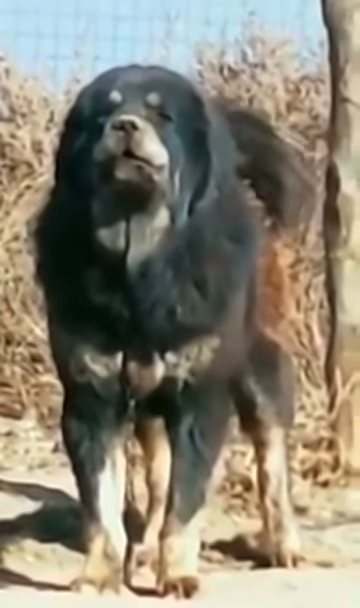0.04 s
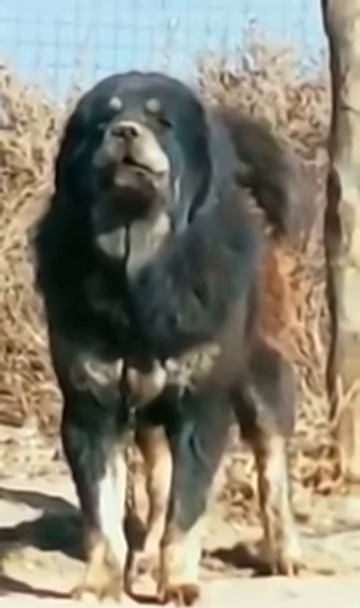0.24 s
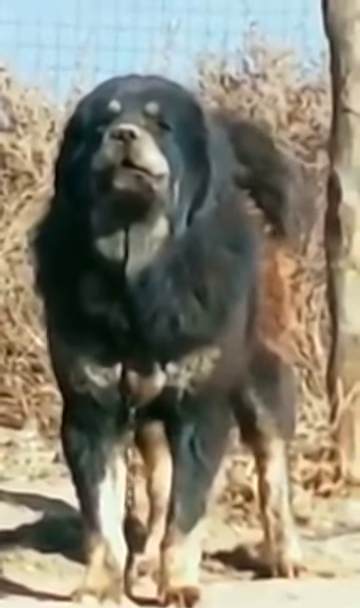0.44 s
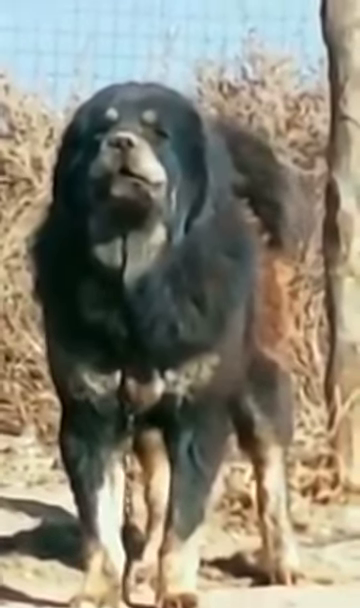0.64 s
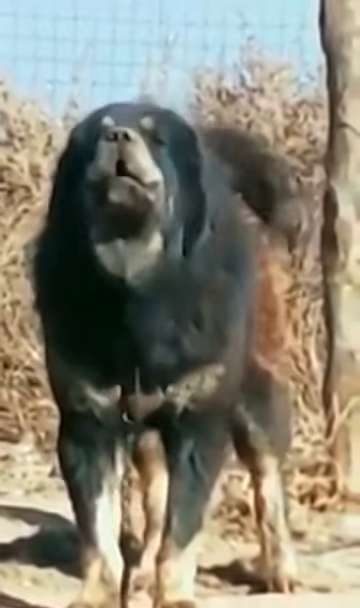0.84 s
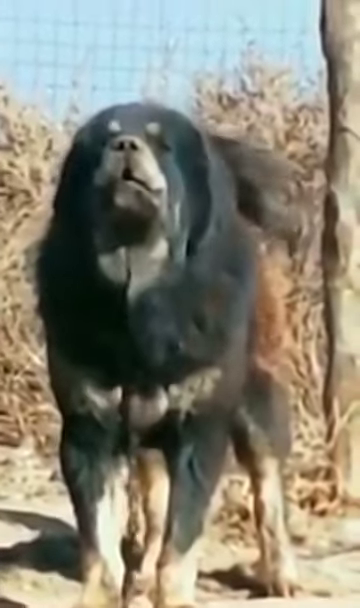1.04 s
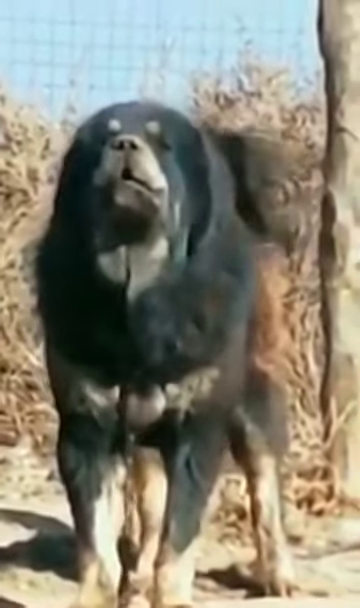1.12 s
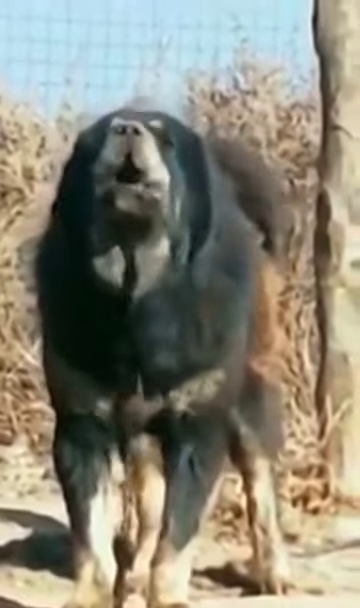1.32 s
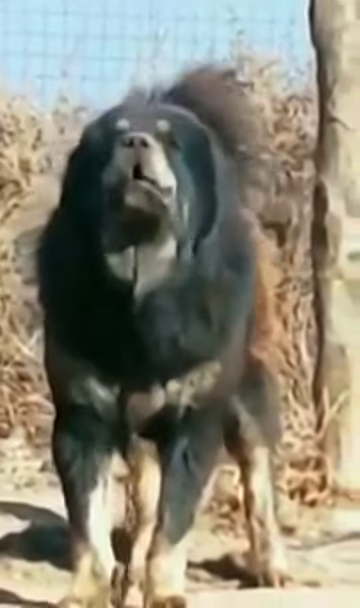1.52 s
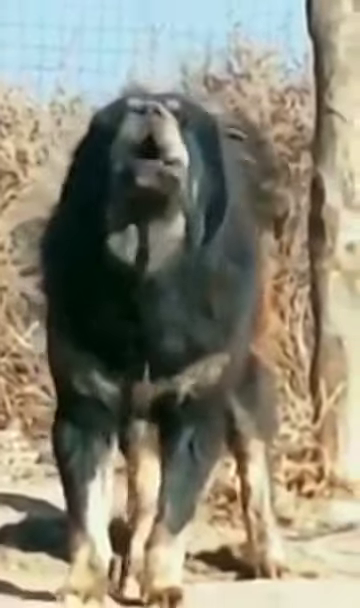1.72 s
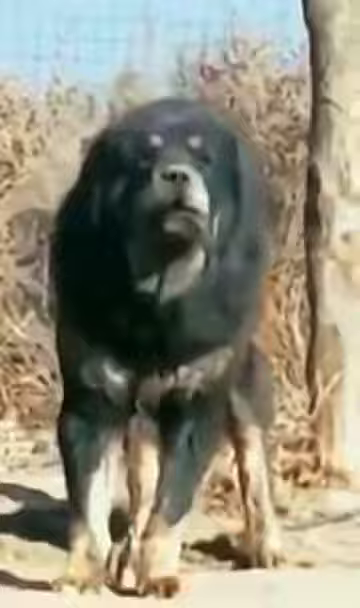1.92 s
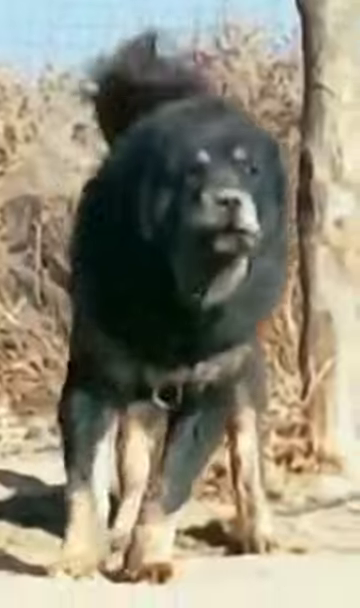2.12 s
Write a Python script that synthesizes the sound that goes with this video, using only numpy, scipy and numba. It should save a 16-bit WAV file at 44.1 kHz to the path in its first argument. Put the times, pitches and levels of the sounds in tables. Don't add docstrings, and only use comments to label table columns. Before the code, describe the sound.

Deep hoarse dog barks in two groups of three, with panting breath and faint wind.

```python
import sys
import numpy as np
from scipy import signal
from scipy.io import wavfile
from scipy.ndimage import uniform_filter1d
from numba import njit

SR = 44100
rng = np.random.default_rng(int(sys.argv[2]) if len(sys.argv) > 2 else 0)


def persist_wave(psi):
    counts = np.round(np.clip(psi, -1, 1) * 32767).astype(np.int16)
    wavfile.write(sys.argv[1], SR, np.atleast_2d(counts).T)


def gain_from_decibels(decibels):
    exponent = np.asarray(decibels, float) / 20
    return 10 ** exponent


N = 95388
T = np.arange(N) / SR


def unit(x):
    return x / np.sqrt(np.mean(x ** 2))


def steady(x):
    return x / np.sqrt(uniform_filter1d(x ** 2, size=1800, mode="reflect") + 1e-12)


def curve(table, axis):
    table = np.array(table, float)
    return np.interp(T, table[:, 0], table[:, axis])


def spectrum(table, hz):
    table = np.array(table, float)
    return np.interp(np.log(hz), np.log(table[:, 0]), table[:, 1])


def walk(rate):
    k = int(SR / rate)
    steps = np.repeat(rng.standard_normal(N // k + 1), k)
    return 1.818 * uniform_filter1d(uniform_filter1d(steps, k), k)[:N]


@njit
def svf(x, hz, width):
    y, b, l = np.empty(len(x)), 0., 0.
    for i in range(len(x)):
        g, k = np.tan(np.pi * hz[i] / SR), width / hz[i]
        v = (b + g * (x[i] - l)) / (1 + g * (g + k))
        b, l, y[i] = 2 * v - b, l + 2 * g * v, k * v
    return y


def steep(x, hz, width):
    hz = hz + np.zeros(N)
    return svf(svf(x, hz, 1.02 * width), hz, 1.02 * width)


def dip(x, hz, width, depth):
    return x - depth * svf(x, hz + np.zeros(N), 1. * width)


# (f/Hz, level/dB)
WIND_COLOUR = [(15, -44), (25, -17.5), (85, 12), (152, 8.5), (365, 1.5), (500, -3), (650, -41),
               (1100, -120)]
# (t/s, level/dB)
GUSTS = [(1.0, 3.5), (1.4, -3), (1.75, -0.5), (1.95, 8), (2.05, 2), (2.16, 3.5)]


def wind():
    out, swell = 0, walk(3.7)
    for hz in 28 * 2 ** np.arange(0, 4.2, .5):
        db = spectrum(WIND_COLOUR, hz) + 1.2 * swell + 3 * walk(14)
        out = out + gain_from_decibels(db) * steep(rng.standard_normal(N), hz, hz / 3)
    return unit(out) * gain_from_decibels(-60.5 + curve(GUSTS, axis=1))


def yard(dog):
    t60_s, level_db, dull_above_hz = 0.21, -26.5, 2400
    tail = rng.standard_normal(N) * gain_from_decibels(-60 * T / t60_s)
    tail = tail * (T > .012)
    tail = signal.sosfilt(signal.butter(1, dull_above_hz, fs=SR, output="sos"), tail)
    tail = tail / np.sqrt(np.sum(tail ** 2))
    return signal.fftconvolve(dog, tail)[:N] * gain_from_decibels(level_db)


# (t/s, f/Hz, level/dB)
PAWS = [
    (2.01, 130, -43),
    (2.109, 248, -40),
    (2.142, 213, -44),
    (2.152, 203, -39),
]
# (t/s, level/dB)
SCUFFLE = [(1.9, -85), (2.0, -61), (2.07, -58.5), (2.16, -54)]


def paws():
    thud_width_hz, scuffle_hz, scuffle_width_hz = 43, 230, 200
    out = unit(steep(rng.standard_normal(N), scuffle_hz, scuffle_width_hz))
    out = out * gain_from_decibels(curve(SCUFFLE, axis=1) + 3 * walk(30))
    for t0, hz, db in PAWS:
        age = (T - t0).clip(0)
        fade = np.exp(-np.pi * thud_width_hz * age)
        out = out + gain_from_decibels(db) * fade * np.sin(2 * np.pi * hz * age)
    return out


# (t/s, length/s, from f/Hz, to f/Hz, level/dB, waver 0-1)
WHEEZES = [(1.715, .1, 1410, 1500, -64, .022), (2.02, .07, 1070, 1080, -64, .012),
           (.12, .07, 570, 560, -62, .02), (.79, .28, 2290, 2330, -82, .03),
           (1.25, .21, 1340, 1370, -67, .03)]


def wheezes():
    out = np.zeros(N)
    for t0, length, from_hz, to_hz, db, waver in WHEEZES:
        u = np.clip((T - t0) / length, 0, 1)
        hz = (from_hz + (to_hz - from_hz) * u) * (1 + waver * walk(40))
        swell = np.sqrt(np.sin(np.pi * u).clip(0))
        out = out + gain_from_decibels(db + 2.5 * walk(50)) * swell * np.sin(2 * np.pi * np.cumsum(hz) / SR)
    return out


# (t/s, level/dB, hiss level/dB)
BREATH = [(.1, -59.5, 5.5), (.2, -72, 1.5), (.3, -68, 3), (.75, -66, 2), (.85, -68.5, -2.5),
          (1.06, -67, -10), (1.28, -51.5, 2), (1.44, -64.5, 3), (1.68, -60, 6), (1.78, -66.5, -8),
          (2.0, -68, 5.5), (2.16, -78.5, 0.5)]
# (f/Hz, width/Hz, level/dB)
AIRWAY = [(367, 140, -2), (564, 130, -7.5), (752, 92, -11), (1212, 210, -5.5), (1374, 110, -11.5),
          (1792, 280, -10)]
# (f/Hz, width/Hz)
BREATH_DIPS = [(920, 200), (1510, 150)]
# (t/s, depth 0-1)
DIP_DEPTH = [(.15, .3), (.4, 1), (.7, .5), (.9, 1), (1.35, .4), (1.75, .6), (2.05, .8)]


def breath():
    out = 0
    for hz, width, db in AIRWAY:
        flicker_db = 3 * walk(24.263) + 1.5 * walk(6)
        rush = steep(rng.standard_normal(N), hz, 2.0 * width)
        rush = steep(rush, hz * (1 + .01 * walk(2.3)), 1.33 * width)
        out = out + gain_from_decibels(db + flicker_db) * unit(rush)
    for hz, width in BREATH_DIPS:
        out = dip(out, hz, width, curve(DIP_DEPTH, axis=1).clip(0, 1))
    return out * gain_from_decibels(curve(BREATH, axis=1)) + wheezes()


# (t/s, throat level/dB at its lowest, second and upper resonances,
# top of the hiss level/dB, hiss level/dB, cheek pockets 0-1)
POSE = [
    (.05, 25.5, -17.5, -15, -13.5, 6.5, 0.73),
    (.3, 6.5, -10.5, -1.5, -4, 0.5, 0.48),
    (.6, 5, 4, 4, 1, 3, 0.29),
    (1.18, 1.5, 1, 5.5, 1, 3, 0.29),
    (1.58, 0, -3, 3.5, 1.5, 0, 0.14),
    (1.9, 24.5, 13.5, 1, -13, 5, 0.85),
]


def narrowness():
    return curve(POSE, axis=6).clip(0, 1)


# (f/Hz, width/Hz, depth 0-1)
POCKETS = [(828.7, 184, 0.95), (1483, 97, 0.97)]


def pockets(x):
    for hz, width, depth in POCKETS:
        x = dip(x, hz, width, depth * (1 - .4 * narrowness() ** 2))
    return x


# (f/Hz, width/Hz)
CHEEKS = [(2230, 420), (3600, 440), (7250, 470)]


def cheeks(x):
    for hz, width in CHEEKS + CHEEKS:
        x = dip(x, hz, width, narrowness())
    return x


# (f/Hz, level/dB)
TEETH = [(2700, -2.5), (3500, -8), (4500, 1), (5500, 2), (7500, -6), (8600, -13.5), (9200, -28)]


def hiss(gust):
    out, top_db = 0, curve(POSE, axis=4)
    for hz in 2550 * 2 ** np.arange(0, 1.8, 1 / 7):
        db = spectrum(TEETH, hz) + (hz > 4800) * top_db + 3.5 * walk(28.02)
        out = out + gain_from_decibels(db) * steep(gust, hz, hz / 12)
    return steady(out)


def ring(x, hz, width, db, flicker_db):
    return gain_from_decibels(db + flicker_db * walk(60.07)) * steady(steep(x, hz, width))


# (f/Hz, width/Hz, level/dB)
THROAT = [(858, 48, -35), (1111, 113, -22.5), (1787, 305, -32.5), (2192, 200, -36.5), (2523, 140, -45.5),
          (1319, 100, -36.5), (2954, 220, -53)]


def throat(rasp, rasp_db):
    out, rise = 0, 1 + .006 * rasp_db.clip(-10, 10)
    for k, (hz, width, db) in enumerate(THROAT):
        pose_db = curve(POSE, axis=min(1 + k, 3))
        out = out + (-1) ** k * ring(rasp, hz * rise, width, db + rasp_db + pose_db, 2.5)
    return out


# (f/Hz, width/Hz, level/dB)
MOUTH = [(446.2, 145, -9), (561.3, 104, -8), (676.3, 108, -14.5)]


def mouth(source, open_db):
    out, lips = 0, 1 - 0.0141 * open_db.clip(-15, 10)
    for k, (hz, width, db) in enumerate(MOUTH):
        out = out + (-1) ** k * ring(source, hz * lips, width, db + open_db, 2.46)
    return out


@njit
def beat(hz, wobble, scatter, sub, chance):
    pulses, phase, p, k = np.zeros(len(hz) + 1), np.empty(len(hz)), 0., 0
    for i in range(len(hz)):
        step = hz[i] * np.exp(wobble[i] * chance[k, 0]) / SR
        p += step
        if p >= 1:
            p, k = p - 1, k + 1
            size = np.exp(scatter[i] * chance[k, 1]) * (1 + sub[i] * (2 * (k % 2) - 1))
            pulses[i] += size * p / step
            pulses[i + 1] += size * (1 - p / step)
        phase[i] = p
    return pulses[:-1], phase


# (t/s, roughness 0-1, strong-weak depth 0-1)
FOLDS = [(0, .7, .1), (.045, .2, 0), (.09, .5, .1), (.24, .4, .1), (.29, .1, 0), (.33, .3, .1),
         (.38, .8, .2), (.49, .35, .2), (.53, .8, .3), (.61, .55, .5), (.67, .9, .4), (.71, .4, .1),
         (1.09, .35, .1), (1.15, .85, .4), (1.2, .5, .3), (1.23, .85, .3), (1.26, .35, .2), (1.3, .9, .2),
         (1.5, .2, .1), (1.535, .9, .5), (1.58, .5, .4), (1.63, .8, .3), (1.66, .45, .2), (1.7, .9, .2),
         (1.83, .25, .2), (1.87, .65, .4), (1.92, .25, .6), (1.97, .75, .3)]


def folds(hz):
    jitter, shimmer_db, flutter_hz, flutter_depth = .17, 3.5, 62, .65
    rough = curve(FOLDS, axis=1)
    chance = rng.standard_normal((2000, 2)).clip(-2, 2)
    scatter = np.log(gain_from_decibels(shimmer_db)) * rough
    pulses, phase = beat(hz, jitter * rough, scatter, curve(FOLDS, axis=2), chance)
    turns = np.cumsum(flutter_hz * (1 + .35 * walk(25))) / SR
    flutter = 1 + flutter_depth * rough * np.sin(2 * np.pi * turns)
    pulses = unit((pulses - pulses.mean()) * flutter)
    gust = unit(rng.standard_normal(N) * np.exp(-phase / 1.5))
    return pulses, gust, rough


def blend(pulses, gust, air):
    return (pulses + air * gust) / np.sqrt(1 + air ** 2)


# (t/s, level/dB, pitch f/Hz, mouth opening level/dB, rasp level/dB)
FIRST_RUN = [
    [(0, -29, 315.6, -5, 7), (.03, -36, 290.6, 10, 1), (.062, -34, 284.7, 8.5, 6.5),
     (.085, -42, 324.8, -8.5, -0.5), (.12, -65, 322.5, -11, 14)],
    [(.21, -60.5, 251.8, -21, -7), (.236, -45.5, 233, -15, -14), (.258, -42, 256.1, -15.5, 0.5),
     (.285, -33, 272, -24, -4), (.33, -43.5, 264, -21, -6), (.42, -57.5, 225.4, -20.5, -5)],
    [(.46, -56.5, 229.5, -11, 0), (.486, -39.5, 265.4, -20, -10.5), (.524, -34.5, 330.6, -3.5, -0.5),
     (.545, -28, 334.7, -0.5, -4.5), (.58, -25.5, 345.2, 2, 2.5), (.62, -24.5, 357.8, -0.5, 9),
     (.67, -31.5, 340.9, -2.5, 0.5), (.712, -42, 344.4, -8.5, 1), (.78, -70, 335.3, -10, 5)],
]
SECOND_RUN = [
    [(1.068, -76.5, 254.8, -5.5, 14), (1.086, -40, 276.9, -13, -4), (1.12, -24.5, 333.7, -4.5, -6),
     (1.17, -25, 385.1, 5, 3.5), (1.195, -19, 402, -3, 3.5), (1.23, -32.5, 361.2, 2, 4),
     (1.258, -27.5, 411.3, -6.5, -13.5), (1.31, -59.5, 360.1, 0, 6)],
    [(1.46, -81.5, 279.1, -13, 4), (1.482, -31.5, 298.3, -11.5, -3.5), (1.515, -24.5, 319.7, -8.5, -6),
     (1.545, -25, 399.9, 4.5, -2), (1.58, -21.5, 404.8, 3, 4), (1.61, -24, 375.3, 2, 5),
     (1.636, -33, 398.3, -0.5, -0.5), (1.66, -32.5, 391.4, -8.5, -3.5), (1.7, -57.5, 378.3, -6, 0.5)],
    [(1.8, -62, 310.4, -11, -7), (1.828, -29.5, 339.5, -19, -10.5), (1.874, -29.5, 360.6, -3, -2.5),
     (1.92, -30.5, 354.5, -4, 3.5), (1.945, -34, 328.6, 9, 5), (1.964, -33.5, 310.1, -4.5, -9),
     (2.0, -66, 338.9, 9, 9)],
]
BARKS = FIRST_RUN + SECOND_RUN


def barks():
    rows = [row for bark in BARKS for row in bark]
    on = sum((T >= bark[0][0]) & (T <= bark[-1][0]) for bark in BARKS)
    effort = gain_from_decibels(curve(rows, axis=1)) * uniform_filter1d(1. * on, 600, mode="nearest")
    hz, open_db, rasp_db = curve(rows, axis=2), curve(rows, axis=3), curve(rows, axis=4)

    pulses, gust, rough = folds(hz)
    source = blend(pulses, gust, gain_from_decibels(1) * rough)
    rasp = blend(pulses, gust, gain_from_decibels(11) * rough)

    chest = ring(source, hz, 180, 0, 0.71)
    mouth_top = signal.butter(3, 870, fs=SR, output="sos")
    voice = signal.sosfilt(mouth_top, chest - mouth(source, open_db)) - throat(rasp, rasp_db)
    voice = signal.sosfilt(signal.butter(4, 200, "high", fs=SR, output="sos"), voice)
    puff = unit(steep(rng.standard_normal(N), 92, 56.0)) * gain_from_decibels(-35.5)

    bark_flow = effort ** 0.77 * gain_from_decibels(-40 + curve(POSE, axis=5) + 0.67 * open_db)
    breath_flow = gain_from_decibels(curve(BREATH, axis=1) - 16 + curve(BREATH, axis=2))
    return cheeks(effort * (voice + puff) + (bark_flow + breath_flow) * hiss(gust))


def scene():
    dog = pockets(barks())
    return (dog + yard(dog) + breath() + paws() + wind())[None]


def top_cut(x):
    return signal.sosfilt(signal.butter(12, 15375, fs=SR, output="sos"), x)


def record(dry):
    top_hz, hush_db, hush_lift_db = 9300, -96, -68
    cut = signal.sosfilt(signal.ellip(8, .2, 60, top_hz, fs=SR, output="sos"), dry)
    loudness = uniform_filter1d(np.abs(dry), size=1500, axis=1)
    hush = gain_from_decibels(hush_db) + gain_from_decibels(hush_lift_db) * loudness
    return top_cut(cut + hush * rng.standard_normal(dry.shape))


dry = scene()
out = record(dry)
persist_wave(out)
```